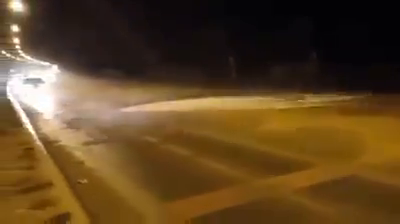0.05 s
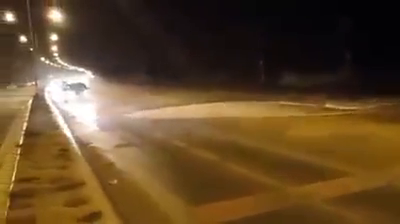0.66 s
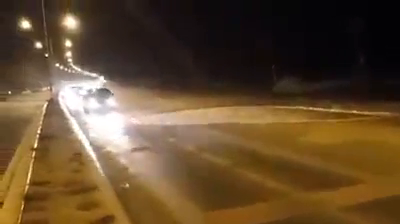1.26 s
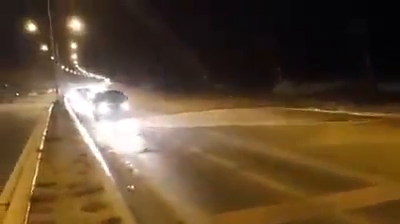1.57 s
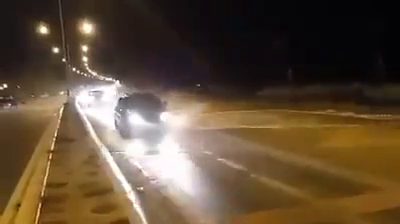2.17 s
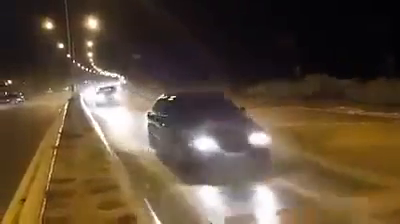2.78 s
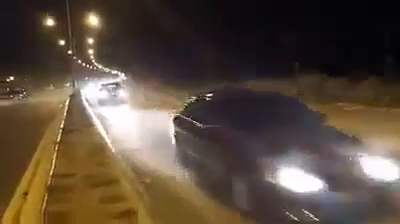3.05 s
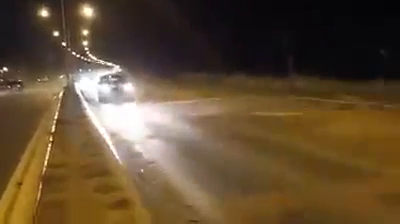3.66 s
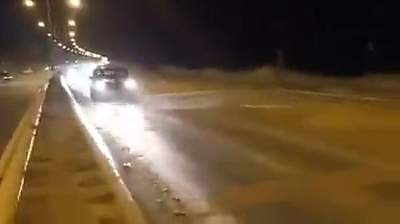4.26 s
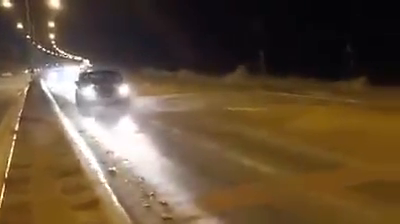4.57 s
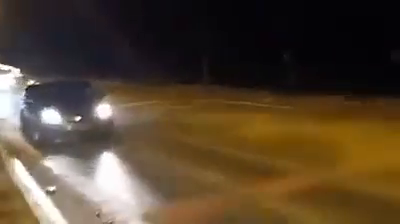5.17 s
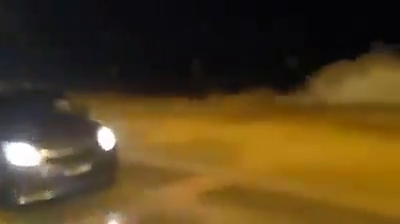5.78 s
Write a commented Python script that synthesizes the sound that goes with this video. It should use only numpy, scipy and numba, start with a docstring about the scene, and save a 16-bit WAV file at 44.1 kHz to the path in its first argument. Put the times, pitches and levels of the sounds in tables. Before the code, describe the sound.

Strong wind rumbles on a phone microphone throughout, hitting it with short rough bursts, hard slaps and low booms. Behind it, sea surf rushes steadily along a flooded coastal road. A car approaches and passes close by a little past halfway, its tyres hissing and splashing through the water with a thin high ring. A second car's spray is growing louder at the end.

```python
"""Wind rumbles on a phone's microphone, then hits it in short rough bursts, hard slaps and low booms:
eddies of air pushing at the port. It is a stormy night on a flooded coast road, with surf rushing behind.
One car passes close by through the water and a second is still nearing at the end; torn droplets hiss
and the tyres' tread grooves sing. The phone's gain ducks after the loud gusts."""
import sys
import numpy as np
from scipy import signal
from scipy.fft import rfft, irfft, next_fast_len
from scipy.io import wavfile
from scipy.ndimage import uniform_filter1d, minimum_filter1d, map_coordinates
from numba import njit

SR = 44100
rng = np.random.default_rng(int(sys.argv[2]) if len(sys.argv) > 2 else 0)


def unload_audio(sound):
    """Save the sound as a 16-bit wav file, at the path given as the first command line argument."""
    columns = np.transpose(np.atleast_2d(sound))
    # keep every value between -1 and 1, then stretch to whole-number steps
    steps = np.round(np.clip(columns, -1, 1) * 32767)
    wavfile.write(sys.argv[1], SR, steps.astype(np.int16))


N = 265923
TIME = np.arange(N) / SR


def undb(db):
    """Decibels to gain."""
    return 10 ** (np.asarray(db) / 20)


def unit(x):
    """Scale to rms 1."""
    return x / np.sqrt(np.mean(x ** 2) + 1e-18)


def automation(table):
    """One curve in time for each column after the first."""
    times, *columns = np.transpose(table)
    return [np.interp(TIME, times, column) for column in columns]


def colour(x, eq, edge_hz=np.inf, slope=3.):
    """Minimum-phase EQ through (f/Hz, level/dB) points, rolled off above an edge; rms 1."""
    size = 2 * next_fast_len(len(x) // 2 + 1)
    f = np.fft.rfftfreq(size, 1 / SR) + 1
    hz, db = np.transpose(eq)
    gain = undb(np.interp(np.log(f), np.log(hz), db)) / np.sqrt(1 + (f / edge_hz) ** (2 * slope))
    cepstrum = irfft(np.log(gain))[:size // 2]
    cepstrum[0] = 0
    response = np.exp(rfft(2 * cepstrum, size))
    return unit(irfft(rfft(x, size) * response)[:len(x)])


def wobble(rate):
    """Smooth random modulation with a spread near 1, changing about rate times a second."""
    return map_coordinates(rng.standard_normal(4096), [TIME * rate], order=3, mode="wrap")


def steady(x, span_s):
    """Even out swells slower than span_s, so that an envelope alone sets them."""
    return x / np.sqrt(uniform_filter1d(x ** 2, int(span_s * SR)) + 1e-9)


@njit
def bandpass(x, hz, width):
    """State-variable band-pass whose centre and width can sweep."""
    y, band_state, low_state = np.empty(len(x)), 0., 0.
    for i in range(len(x)):
        tuning, damping = np.tan(np.pi * hz[i] / SR), width[i] / hz[i]
        band = (band_state + tuning * (x[i] - low_state)) / (1 + tuning * (tuning + damping))
        band_state = 2 * band - band_state
        low_state += 2 * tuning * band
        y[i] = damping * band
    return y


def ring(x, hz, width_hz):
    """A steep resonance: the band-pass twice over."""
    hz, width_hz = hz * np.ones(N), width_hz * np.ones(N)
    return bandpass(bandpass(x, hz, width_hz), hz, width_hz)


def swell(centre, length, rise, fall):
    """An envelope peaking at 1; rise and fall are the steepness of its flanks."""
    offset = 2 * (TIME - centre) / length
    near = np.abs(offset) < 20
    steepness = np.where(offset[near] < 0, rise, fall)
    envelope = np.zeros(N)
    envelope[near] = 1 / np.sqrt(1 + np.abs(offset[near]) ** (2 * steepness))
    return envelope


def eddies(rate, scatter_db, count=6000):
    """Separate kicks of air pressure at uneven intervals."""
    times = np.cumsum(rng.gamma(2, .5 / rate, count))
    kicks = undb(scatter_db * rng.standard_normal(count)) * rng.choice([-1, 1], count)
    return unit(np.bincount((times * SR).astype(int), kicks, N)[:N])


def drops(rate, spread_db):
    """Dense droplet impacts, a few much larger than the rest."""
    hits = rng.random(N) < rate / SR
    size = undb(spread_db * np.minimum(rng.exponential(size=N), 5))
    return unit(hits * size * np.sign(rng.standard_normal(N)))


# strength of the wind bed: t/s, level/dB
WIND_STRENGTH = [(0.0, -35.5), (0.34, -29.5), (0.9, -33.5), (1.0, -32.5), (1.15, -29), (1.42, -29),
                 (1.59, -24.5), (1.75, -29), (1.96, -27), (2.2, -35.5), (2.42, -34.5), (2.67, -26), (2.95, -29),
                 (3.32, -27.5), (3.8, -24.5), (3.95, -29), (4.19, -29), (4.35, -26), (4.6, -26.5),
                 (4.75, -26.5), (5.1, -31), (5.37, -28), (5.54, -24.5), (6.03, -26.5)]
# tone of turbulence at the microphone port: f/Hz, level/dB
TURBULENCE_EQ = [(15, -43.5), (30, -22), (50, -11.5), (75, -2), (120, 2), (250, -3), (500, -4.5),
                 (1000, -5.5), (2000, -5.5), (6000, -14.5)]
# tone of the wind's flapping: f/Hz, level/dB
FLAP_EQ = [(50, -35), (100, -13.5), (150, -5.5), (220, 1.5), (330, 0), (480, -4.5), (900, -55.5)]


def wind_rumble():
    """Large, slow eddies push at the port; stronger wind brings more flapping and smaller eddies too."""
    flap_onset_db, flap_knee_db = 5, 4.5
    wind_db, = automation(WIND_STRENGTH)
    excess_db = wind_db - np.mean(wind_db)
    large = steady(colour(rng.standard_normal(N), TURBULENCE_EQ, edge_hz=280, slope=2.47), span_s=0.037)
    flapping = steady(colour(rng.standard_normal(N), FLAP_EQ), span_s=0.031)
    flap_share = 1 / (2 + np.exp((flap_onset_db - excess_db) / flap_knee_db))
    body = np.sqrt(1 - flap_share) * large + np.sqrt(flap_share) * flapping
    small = colour(eddies(rate=130, scatter_db=5.5), TURBULENCE_EQ, edge_hz=775, slope=3.7)
    return body * undb(wind_db - 0.02 + 2.5 * wobble(35)) + small * undb(-39 + 1.3 * excess_db)


# tone of the surf: f/Hz, level/dB
SURF_EQ = [(20, -12.5), (50, -3.5), (150, 14), (400, -0.5), (700, -0.5), (1000, 4), (1400, 0), (1800, -1.5),
           (3000, -7), (8000, -66)]
# waves washing in over the surf bed: centre t/s, length/s, boost/dB
WAVE_SWELLS = [(1.93, 3.2, 6.5), (5.196, 1.7, 0.5)]


def surf():
    """Breakers roar far off, and their foam churns nearer by."""
    wave_db = sum(db * swell(centre, length, rise=11, fall=11) for centre, length, db in WAVE_SWELLS)
    water = colour(drops(rate=5000, spread_db=2.5), SURF_EQ)
    return water * undb(-44.5 + wave_db + 3.1 * wobble(21.87))


# car pass-bys: abreast t/s, closest distance/m, base spray level at 1 m/dB, base song level at 1 m/dB
PASS_BYS = [(3.55, 4.8, -34.5, -40), (6.14, 3.57, -25.5, -35)]


def traffic_levels():
    """Spray and tread song in dB: cars grow louder as they near, over a queue far up the road."""
    speed_m_s, spray_ahead_db = 12.1, 3.5  # tyres hiss more ahead than behind
    spray_power, song_power = undb(-56.5) ** 2, undb(-47.5) ** 2  # the far queue
    for abreast_s, aside_m, spray_db, song_db in PASS_BYS:
        along_m = speed_m_s * (abreast_s - TIME)
        distance_m = np.hypot(along_m, aside_m)
        heading = along_m / distance_m  # 1 head-on, -1 going away
        spray_power += (undb(spray_db + spray_ahead_db * heading) / distance_m) ** 2
        song_power += (undb(song_db) / distance_m) ** 2
    return 10 * np.log10(spray_power), 10 * np.log10(song_power)


# tone of the spray's hiss: f/Hz, level/dB
SPRAY_EQ = [(400, -30), (1000, -4.5), (1800, 1.5), (2500, 6.5), (3000, 3), (3600, 0.5), (4400, 0),
            (5200, 0), (6200, -7.5), (6800, -20), (9000, -35)]
# airy top of the fine mist: f/Hz, level/dB
MIST_EQ = [(4000, -31), (6400, -4.5), (7100, 11), (8000, 7), (9000, 8), (9700, -3), (11000, -32.5)]


def tyre_spray(traffic_db, flood_db):
    """Droplets torn from the flooded road hiss; their fine mist is heard best from close by."""
    hiss = colour(drops(rate=16000, spread_db=1.5), SPRAY_EQ) * undb(3.5 + 1.24 * wobble(45))
    mist_db = -22.5 + 0.26 * (traffic_db - np.mean(traffic_db)) + 1.5 * wobble(24)
    mist = colour(drops(rate=4200, spread_db=2.5), MIST_EQ) * undb(mist_db)
    return (hiss + mist) * undb(traffic_db + flood_db)


# shared resonance of the tread grooves: t/s, f/Hz, width/Hz
TREAD_RING = [(0.0, 2290, 532), (0.91, 2327, 546), (1.53, 2280, 500), (2.5, 2200, 415), (3.06, 2247, 401),
              (3.14, 2398, 525), (4.35, 2342, 515), (5.04, 2447, 548), (5.35, 2460, 647), (5.93, 2410, 600),
              (6.03, 2135, 556)]
# single grooves that poke out of it: pitch ratio, width/Hz, relative level/dB
SOLO_GROOVES = [(0.94, 120.5, -11), (1.0, 109.5, -13), (1.06, 121, -11.5)]


def tread_song(traffic_db, flood_db):
    """Air and water squeezed out of the tread grooves ring them like short pipes."""
    hz, width_hz = automation(TREAD_RING)
    hz = hz * (1 + .014 * wobble(40))
    song = unit(ring(drops(rate=6000, spread_db=3.5), hz, width_hz))
    for ratio, groove_width_hz, db in SOLO_GROOVES:
        groove = ring(rng.standard_normal(N), hz * ratio * (1 + 0.016 * wobble(12)), groove_width_hz)
        song += unit(groove) * undb(db + 2.5 * wobble(14))
    return steady(song, span_s=0.08) * undb(traffic_db + flood_db + 0.2 + wobble(35))


# bounce of the tyre sound off the roadside: t/s, lag/ms, gain (0-1)
ROADSIDE_BOUNCE = [(0.0, 0.72, 0.08), (1.3, 0.9, 0.08), (2.3, 0.91, 0.11), (2.9, 0.95, 0.11), (3.5, 1.1, 0),
                   (4.3, 0.73, 0), (5.1, 0.78, 0.13), (6.03, 0.81, 0)]


def roadside_reflection(direct):
    """A faint reflection follows the direct sound; its shifting lag sweeps a comb through the hiss."""
    lag_ms, gain = automation(ROADSIDE_BOUNCE)
    late = map_coordinates(direct, [np.arange(N) - lag_ms * SR / 1000], order=3, mode="mirror")
    return (direct + gain * late) / np.sqrt(1 + gain ** 2)


# rough bursts of wind: centre t/s, length/s, relative level/dB, top edge f/Hz
BUFFET_CUES = [(0.072, 0.034, -27, 466), (0.156, 0.032, -22.5, 356), (0.192, 0.013, -19, 790),
               (0.32, 0.048, -24.5, 556), (0.435, 0.012, -21, 600), (0.575, 0.019, -24.5, 750),
               (0.694, 0.041, -24.5, 350), (0.787, 0.022, -22.5, 610), (0.908, 0.04, -26, 686),
               (0.941, 0.0058, -21.5, 180), (1.024, 0.022, -27.5, 537), (1.223, 0.016, -17.5, 520),
               (1.306, 0.029, -20.5, 676), (1.351, 0.011, -23.5, 595), (1.382, 0.013, -22.5, 300),
               (1.468, 0.011, -10.5, 656), (1.491, 0.04, -23, 754), (1.557, 0.035, -17, 685),
               (1.608, 0.025, -14, 840), (1.666, 0.025, -27, 594), (1.855, 0.048, -16.5, 860),
               (1.914, 0.061, -16.5, 860), (2.013, 0.074, -17.5, 950), (2.095, 0.071, -20, 970),
               (2.562, 0.12, -27, 375), (2.723, 0.039, -22.5, 865), (2.86, 0.052, -23.5, 960),
               (3.192, 0.016, -26.5, 1090), (3.444, 0.026, -23.5, 590), (3.524, 0.021, -26.5, 960),
               (3.613, 0.0075, -20.5, 570), (3.76, 0.047, -18.5, 565), (3.812, 0.042, -17, 557),
               (3.862, 0.023, -28, 316), (3.964, 0.0099, -17.5, 595), (4.127, 0.06, -29.5, 560),
               (4.236, 0.024, -23, 535), (4.277, 0.0084, -19.5, 690), (4.325, 0.022, -20.5, 950),
               (4.373, 0.013, -19, 850), (4.42, 0.068, -30, 566), (4.468, 0.028, -25, 497),
               (4.672, 0.013, -25, 830), (4.719, 0.026, -26.5, 830), (4.863, 0.024, -24, 646),
               (5.169, 0.01, -19.5, 415), (5.258, 0.021, -20.5, 640), (5.417, 0.026, -25, 365),
               (5.529, 0.021, -15, 405), (5.708, 0.021, -23.5, 755), (5.975, 0.011, -21, 770)]
# tone of a buffet's roar: f/Hz, level/dB
BUFFET_EQ = [(15, -44), (30, -24), (50, -13), (80, -1), (120, 1.5), (220, -3.5), (420, -3), (650, -5),
             (1000, -6.5), (1600, -11), (2400, -5), (6000, -16)]


def wind_buffets():
    """Each gust is a lurching churn of eddies; a higher-set roar stands for a faster gust."""
    out, window = np.zeros(N), 8192
    churn = eddies(rate=900, scatter_db=2.5) + .5 * rng.standard_normal(N)
    pressure = steady(churn, span_s=0.008) * undb(3 * wobble(70))
    for centre, length, db, edge_hz in BUFFET_CUES:
        start = max(int(centre * SR) - window // 2, 0)
        near = slice(start, start + window)
        gust = pressure[near] * swell(centre, length, rise=8, fall=4)[near]
        low_cut = signal.butter(1, 0.085 * edge_hz, "high", fs=SR)
        roar = colour(signal.lfilter(*low_cut, gust), BUFFET_EQ, edge_hz, slope=2.69)
        out[near] += roar * np.sqrt(length * SR / len(roar)) * undb(db)  # rms over the gust's length
    return out * undb(0.54)


# hard hits of wind: t/s, relative peak level/dB, top edge f/Hz
SLAP_CUES = [(0.191, -10.5, 490), (0.316, -5.5, 730), (0.431, -6.5, 617), (0.799, -13, 650),
             (0.915, -9, 850), (1.208, -8, 587), (1.221, -7, 650), (1.248, -11, 800), (1.263, -9, 750),
             (1.284, -3, 700), (1.302, -9.5, 800), (1.354, -1.5, 880), (1.462, -8, 1200), (1.465, -7, 520),
             (1.484, -6, 480), (1.491, -9, 990), (1.562, -5, 620), (1.602, -1, 800), (1.617, -6, 990),
             (1.781, -8.5, 700), (1.835, -12, 700), (1.866, -17, 600), (1.885, -3, 1000), (1.908, -11, 800),
             (1.922, -5, 600), (1.991, -13, 850), (2.003, -10, 1000), (2.027, -1, 800), (2.042, -11.5, 700),
             (2.079, -4, 910), (2.721, -9.5, 780), (2.738, -7.5, 950), (2.835, 0, 860), (2.861, -4.5, 646),
             (3.188, -9, 1100), (3.505, -5.5, 990), (3.684, -7, 630), (3.766, -5.5, 600), (3.796, -6, 650),
             (3.831, -10, 855), (3.957, -8, 760), (4, -8, 610), (4.031, -5, 680), (4.074, -11, 487),
             (4.321, -7, 690), (4.377, -7, 650), (5.531, -4, 485), (5.623, -4.5, 560), (5.895, -4.5, 1120)]
# tone of a slap: f/Hz, level/dB
SLAP_EQ = [(15, -40.5), (40, -22), (80, -4), (150, 2.5), (300, 1), (600, -4.5), (1200, -8.5), (6000, -21.5)]


def wind_slaps():
    """One hard eddy hits the port: a push and its rebound; a brighter slap stands for a smaller eddy."""
    out, kick, trim_db = np.zeros(N), signal.unit_impulse(4096), -1.5
    for start_s, peak_db, edge_hz in SLAP_CUES:
        push = colour(kick, SLAP_EQ, edge_hz, slope=3.48)
        start = int(start_s * SR)
        push = push[:N - start] / np.max(np.abs(push))
        out[start:start + len(push)] += push * undb(peak_db + trim_db)
    return out


# low booms of held gusts: centre t/s, length/s, level/dB, f/Hz
BOOM_CUES = [(0.325, 0.037, -23.5, 110), (0.58, 0.066, -27, 130), (0.786, 0.033, -26, 110),
             (1.233, 0.047, -24.5, 78.6), (1.307, 0.098, -24, 110), (1.902, 0.077, -23, 105),
             (2.027, 0.023, -15, 108), (2.849, 0.09, -26.5, 170), (3.78, 0.11, -20.5, 200),
             (3.923, 0.027, -16.5, 153), (4.035, 0.12, -18, 159), (4.1, 0.11, -23, 174),
             (4.397, 0.054, -27, 120)]


def wind_booms():
    """In a held gust, eddies peel off the phone's edge almost regularly: a wavering boom."""
    out, crest_sharpening = np.zeros(N), 0.28
    for centre, length, db, hz in BOOM_CUES:
        pitch = hz * (1 + 0.13 * wobble(25))
        tone = steady(ring(rng.standard_normal(N), pitch, width_hz=110), span_s=0.018)
        octave = np.real(signal.hilbert(tone, next_fast_len(N))[:N] ** 2) / 2
        out += (tone + crest_sharpening * octave) * undb(db) * swell(centre, length, rise=2, fall=4)
    return out


# sheets of sea water on the asphalt: centre t/s, length/s, spray gain/dB, song gain/dB
WATER_SHEETS = [(0.34, 0.072, 5, 0.5), (0.6, 0.26, 10, 2), (0.928, 0.23, 5, 3), (1.268, 0.2, 7.5, 4.5),
                (1.5, 0.069, 5.5, 7.5), (1.796, 0.13, 4, -8), (1.993, 0.29, 3, 4.5), (2.317, 0.027, 6, 6),
                (2.535, 0.29, 3.5, 11.5), (2.574, 0.27, 7.5, 2), (2.9, 0.27, 5, 3.5), (3.243, 0.06, 3.5, 4),
                (3.683, 0.46, 9, 3.5), (4.394, 0.087, 4, 4), (4.758, 0.27, 1, 9), (5.162, 0.32, 4, 10)]


def flood_gains():
    """Tyres run through sheets of water, which ride the spray and the tread song; both gains in dB."""
    spray_db, song_db = np.zeros(N), np.zeros(N)
    for centre, length, sheet_spray_db, sheet_song_db in WATER_SHEETS:
        depth = swell(centre, length, rise=1.735, fall=1.735)
        spray_db += sheet_spray_db * depth
        song_db += sheet_song_db * depth
    return spray_db, song_db


# splash accents: centre t/s, length/s, level/dB, f/Hz
SPLASH_CUES = [(0.412, 0.013, -36.5, 1400), (0.674, 0.0073, -31.5, 2200), (2.33, 0.018, -33, 1270),
               (2.407, 0.0059, -33, 1160), (3.22, 0.077, -54.5, 1650), (3.56, 0.44, -41, 1910),
               (3.536, 0.047, -34.5, 3800), (4.69, 0.082, -42, 1700), (5.051, 0.014, -30.5, 2360),
               (5.12, 0.25, -51, 1710), (5.547, 0.22, -39, 1690), (5.957, 0.31, -40, 1950)]


def tyre_splashes():
    """Deeper standing water bursts from under a tyre."""
    out, water = np.zeros(N), drops(rate=4400, spread_db=1.5)
    for centre, length, db, hz in SPLASH_CUES:
        splash = unit(ring(water, hz, width_hz=0.5 * hz))
        out += splash * undb(db) * swell(centre, length, rise=1.2, fall=1.6)
    return out


def scene():
    """A mono mix: wind on the microphone up front, the sea and the road behind."""
    spray_db, song_db = traffic_levels()
    spray_flood_db, song_flood_db = flood_gains()
    tyres = tyre_spray(spray_db, spray_flood_db) + tread_song(song_db, song_flood_db) + tyre_splashes()
    wind = wind_rumble() + wind_buffets() + wind_slaps() + wind_booms()
    return (wind + surf() + roadside_reflection(tyres))[None]


def record(dry):
    """The phone ducks its gain after loud gusts, limits the hardest thumps and cuts the top."""
    knee_db, duck_slope, release_s, makeup_db = -19, 0.34, 0.14, 0.5
    ceiling_db, limiter_s, top_hz = -4, 0.0028, 9650
    pole = np.exp(-1 / (release_s * SR))
    power = signal.lfilter([1 - pole], [1, -pole], dry ** 2)
    ducked = dry / (1 + power / undb(knee_db) ** 2) ** (duck_slope / 2) * undb(makeup_db)
    span = int(limiter_s * SR)
    allowed_gain = 1 / np.maximum(1, np.abs(ducked) / undb(ceiling_db))
    limited = ducked * uniform_filter1d(minimum_filter1d(allowed_gain, span), span)
    high_cut = signal.ellip(12, .2, 80, top_hz, fs=SR, output="sos")
    return signal.sosfilt(high_cut, limited)


dry = scene()
out = record(dry)
unload_audio(out)
```